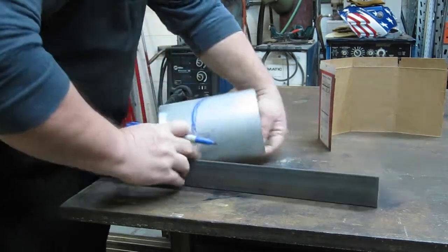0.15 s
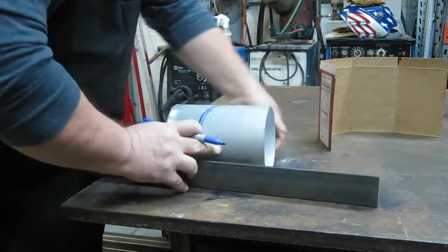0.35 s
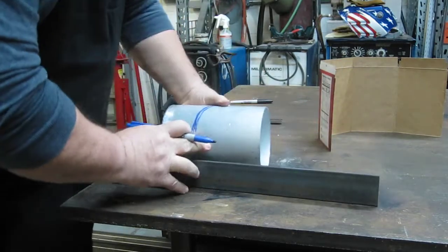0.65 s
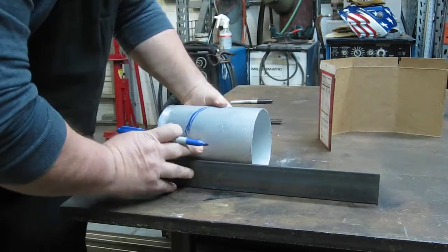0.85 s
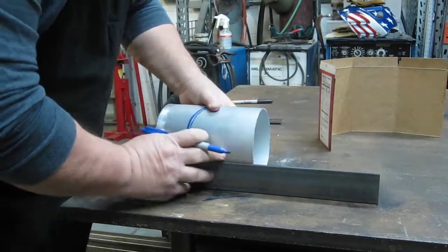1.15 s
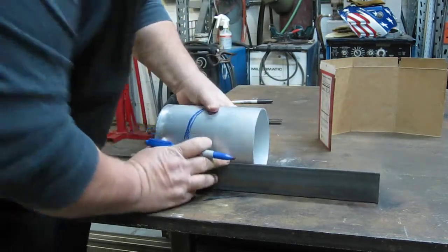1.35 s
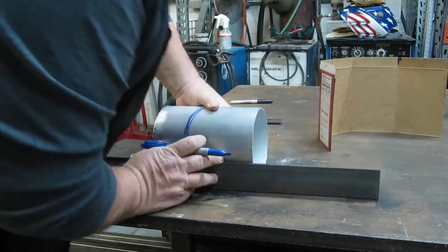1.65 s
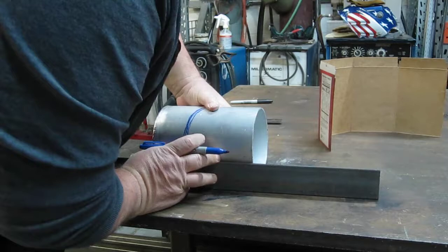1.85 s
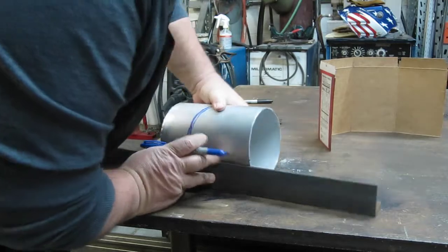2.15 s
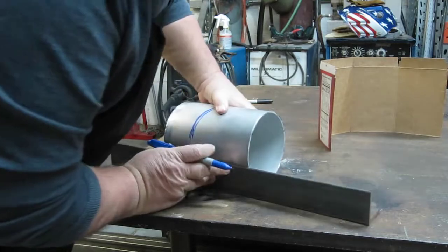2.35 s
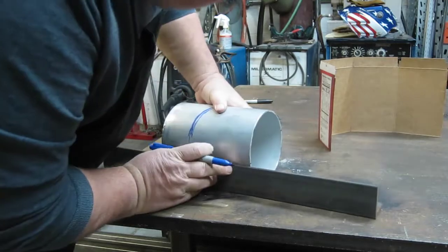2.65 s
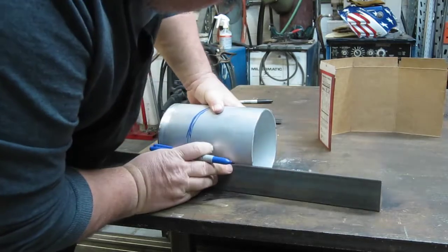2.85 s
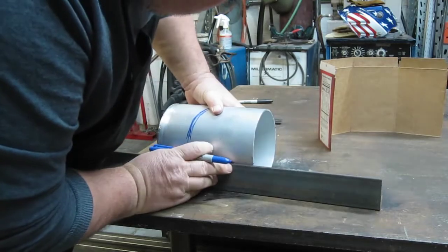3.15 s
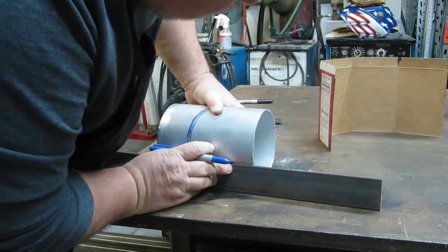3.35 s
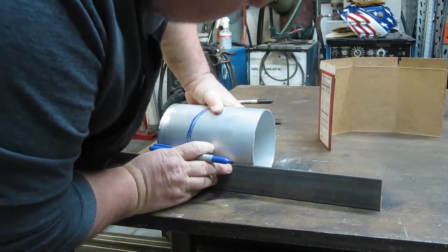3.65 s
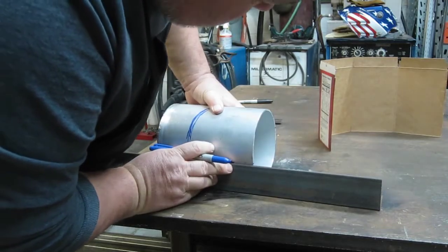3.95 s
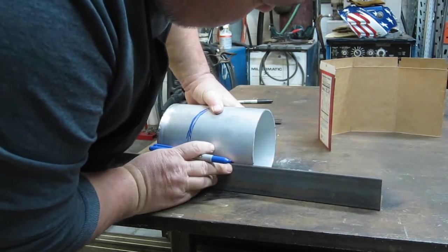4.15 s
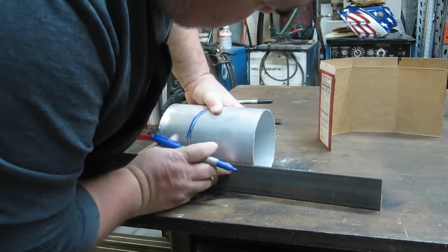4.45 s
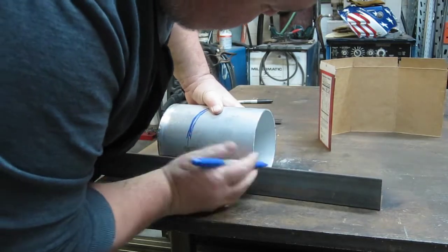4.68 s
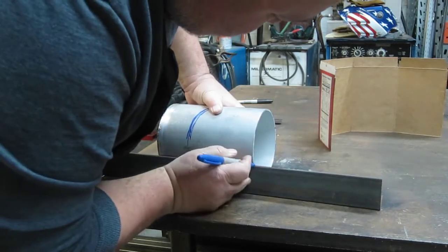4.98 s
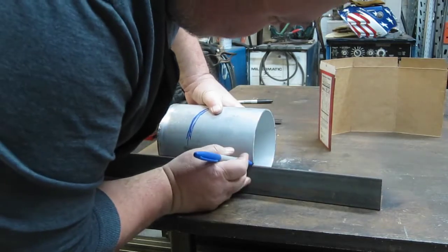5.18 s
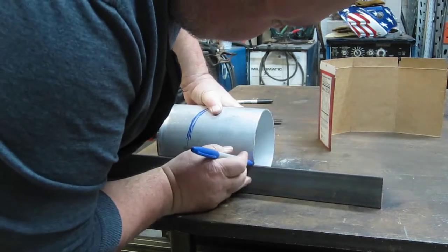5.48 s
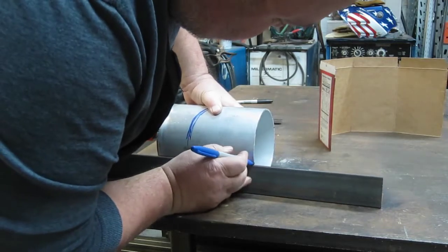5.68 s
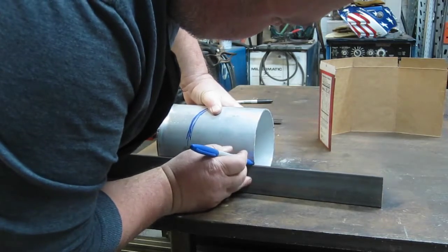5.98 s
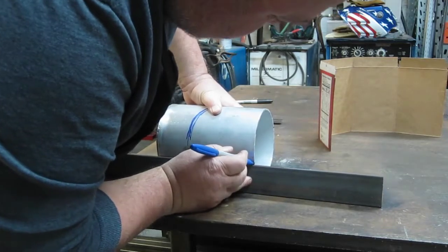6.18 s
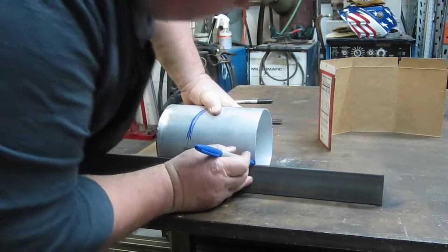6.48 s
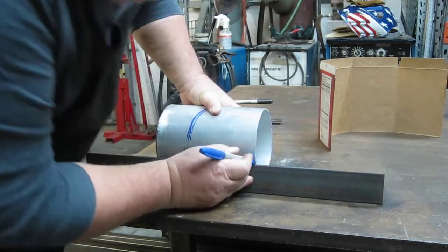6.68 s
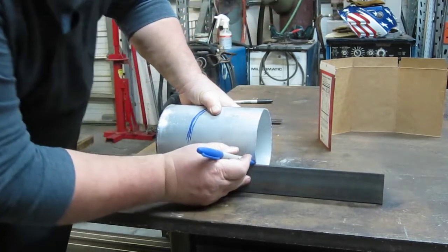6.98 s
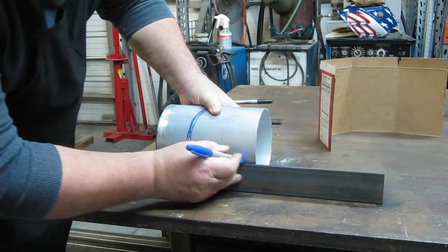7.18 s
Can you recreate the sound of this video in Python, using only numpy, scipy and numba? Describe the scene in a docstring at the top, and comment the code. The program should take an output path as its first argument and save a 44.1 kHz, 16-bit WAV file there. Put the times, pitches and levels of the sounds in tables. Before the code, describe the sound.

A thin aluminium tube squeals, clangs and bounces against a steel bar on a steel table, settles with knocks, then a felt marker hisses along it.

```python
"""Metal scrapes, squeals, knocks and bounces mingle as a thin aluminium tube rolls against a steel angle bar
on a steel table. Palms slide over the tube now and then; near the end a felt marker starts a line along it.
Decaying modes make the knocks, random grains the rattle and friction, uneven overtones the squeal.
Noise, faint tones and decaying noise tails make the echoing workshop; one microphone hears it all
behind a gain control that lets the loudest blows clip before they pull the level down."""
import sys
import numpy as np
from scipy import signal
from scipy.fft import rfft, irfft, next_fast_len
from scipy.io import wavfile
from scipy.ndimage import map_coordinates
from numba import njit

SR = 44100
rng = np.random.default_rng(int(sys.argv[2]) if len(sys.argv) > 2 else 0)


def log_audio(samples):
    """Write samples as a 16-bit WAV file to the path given in sys.argv[1]."""
    # one column per channel
    frames = np.atleast_2d(samples).T
    # limit to full scale, then quantise
    limited = np.clip(frames, -1, 1)
    pcm = np.round(limited * 32767).astype(np.int16)
    wavfile.write(sys.argv[1], SR, pcm)


N = 322812

# Levels are mix levels ahead of the echoes and the gain control; mode widths are those before any damping.
# workshop and microphone noise, spectrum points: pitch_hz, density_db [relative, per Hz]
AIR = [(12, -41), (20, -7), (65, -5), (187, -5), (268, -5), (365, -5), (797, -7), (1180, -2.5), (1390, -11),
       (1840, -6), (2000, -12.5), (2180, -7), (3130, -12.5), (11300, -21.5), (15800, -26.5)]
# faint tones, before they waver: pitch_hz, level_db [rms]
HUM = [(59.2, -67.5), (958.2, -68.5), (1319, -71.5), (1863, -67.5), (1895, -68.5), (2180, -67), (2724, -74)]
# decay of the workshop's echoes: pitch_hz, t60_s
SHOP = [(150, 0.73), (1000, 0.64), (4000, 0.57), (12000, 0.32)]
# a low rumble that comes and goes: peak_s, rise_s, fall_s, deep_db [near 55 Hz], low_db [near 120 Hz]
RUMBLE = [(2.1, .12, 0.21, -68, -45), (2.378, 0.12, 0.15, -60, -52), (6.55, .5, 1.3, -62.5, -73),
          (7.32, 0.25, .1, -59, -57)]
# squeals: peak_s, rise_s, fall_s, level_db
SQUEAL = [(0.0, .02, 0.16, -35.5), (1.95, .04, .1, -54), (2.06, 0.044, 0.031, -49),
          (2.15, 0.13, 0.16, -47.5), (4.385, .02, 0.1, -61)]
# overtones of the squeal, before they flutter: multiple [of the slip rate], level_db
OVERTONES = [(3, 11.5), (4, 4.5), (5, 10), (6, -2), (7, -20)]
# dry ticks of fingers and marker barrel: start_s, level_db, pitch_hz
TICKS = [(1.377, -27, 400), (1.626, -33, 8000), (3.19, -42, 10900), (4.386, -38, 4900), (5.369, -43, 2200),
         (5.47, -49, 6400), (5.554, -52, 5430), (5.751, -54, 8700), (6.316, -42.5, 2480),
         (6.336, -46, 6000), (6.471, -39, 9000), (6.636, -30, 4520), (6.639, -31, 11700),
         (6.889, -44, 12000), (6.905, -48, 6000)]
# the marker tip sets down, then gathers speed: peak_s, rise_s, fall_s, hiss_db, steel_db
MARKER = [(7.06, .07, 0.61, -46, -47), (7.23, 0.21, 0.54, -34.5, -51.5)]
# the tip catches as it starts: start_s, level_db [peak, 4 ms after the start]
CATCHES = [(6.997, -41), (7.019, -33), (7.037, -57), (7.0508, -33), (7.0806, -31)]
# spectrum of the felt's hiss: pitch_hz, density_db [relative, per Hz]
FELT = [(1290, -24), (2200, -14.5), (2680, -19), (2860, -11.5), (3730, -15.5), (4330, -15.5), (6320, -5.5),
        (11100, -9), (13600, -15), (15800, -31)]
# what hums under the marker: pitch_hz, width_hz, level_db
DRAWN = [(1073, 33, 4.5), (1800, 67, -0.5), (3770, 160, -3.5)]
# palms sliding on the tube: peak_s, rise_s, fall_s, dull_db, bright_db
PALMS = [(0.2, 0.41, 0.1, -41.5, -34.5), (0.94, 0.0038, 0.037, -22, -36), (0.965, 0.035, .07, -23, -24.5),
         (1.18, 0.051, 0.026, -46, -30.5), (1.298, 0.01, 0.016, -27, -28), (1.73, 0.097, 0.17, -25, -29.5),
         (4.546, .09, 0.013, -52.5, -40.5), (4.7, 0.085, 0.039, -57, -40.5), (4.882, .07, 0.029, -65, -51),
         (6.42, 0.21, 0.32, -52, -51.5), (6.47, 0.043, 0.046, -42, -61), (6.7, .1, 0.23, -69, -66),
         (6.904, .09, 0.055, -50, -51)]
# metal dragged on metal: peak_s, rise_s, fall_s, tube_db [rattle], bar_db [grind], table_db [grind]
DRAG = [(0.0, .05, 0.11, -31.5, -23, -25.5), (0.449, 0.16, 0.046, -12.5, -15.5, -43),
        (0.659, 0.2, 0.046, -24.5, -25, -35), (0.88, 0.19, 0.33, -31, -31, -35.5),
        (1.2, 0.071, 0.12, -47, -53, -51), (1.37, 0.12, 0.13, -49, -64, -43),
        (1.504, 0.082, 0.2, -35.5, -28, -40), (2.12, 0.16, 0.27, -44.5, -39.5, -39),
        (2.3, 0.064, 0.08, -32, -25, -28), (2.625, 0.017, 0.0083, -30, -33, -61),
        (2.953, 0.0084, 0.011, -27, -34, -60)]
# shell modes of the tube: pitch_hz, width_hz, level_db
TUBE = np.transpose([ [565, 1545, 2852, 2930, 3565, 3672, 4703, 4918, 5175, 5385, 5655, 6110, 6400, 6783, 6880, 7251, 7700, 8586, 9367, 9878, 10120, 10690, 11050, 12420, 13520],
        [6, 3, 8, 6, 8, 12, 6, 12, 11, 12, 10, 14, 14, 10, 12, 8, 14, 10, 10, 22, 10, 14, 20, 24, 30],
        [-16.5, -3, 0.83, 4.0, 1.9, 3.3, 0.98, -4.5, 2.8, -7, 0.5, -38.0, -10.5, -39, -5.5, -5, -7, -7.5, -26, -10.5, -32, -14, -14.5, -12, -38]])
# modes of the steel angle: pitch_hz, width_hz, level_db
BAR = np.transpose([ [950, 1048, 1160, 1237, 1330, 1710, 1765, 1865, 2030, 3030, 3360, 3812, 4060, 6010],
       [30, 18, 30, 30, 25, 22, 25, 20, 40, 30, 35, 35, 16, 25],
       [-0.5, 1.0, -2, -16.5, -17.5, 0.5, -49.0, -9, -4.0, -2.5, -4.5, -1.5, -4, -8.0]])
# modes of the steel table top: pitch_hz, width_hz, level_db
TABLE = np.transpose([ [200, 320, 385, 455, 517, 650, 750, 838], [60, 40, 16, 25, 16, 40, 30, 12],
         [-8.5, -3, 1.0, -8, -9.5, -9, -3.5, -4.0]])
# knocks, and at 1.448 s the first touch of a scrape: start_s, level_db, tube_db, bar_db, table_db, grip_db
# [above 1 Hz of width added to the tube; the bar gets 1.46 times as much], hardness_db [per octave],
# favoured_hz [mode the contact point favours and the grip spares], favoured_db
BLOWS = [(0.0, -28, 3.5, -10, -37, 2, 5, 4918, 15), (0.087, 3.5, -28, -33, -20.5, 28, -16.5, 1003, 0),
         (0.279, 16.5, -11.5, -13.5, -26.5, 10, 3.5, 1545, 14),
         (0.612, -19, 0, -18, -26, 10, -10.5, 2852, 9),
         (0.817, -3.5, 2, 6.5, -37.5, 37.5, -5.5, 2852, -4.5),
         (0.962, -12.5, -14, -12, -13.5, 18, -9, 3000, 11),
         (1.065, -3.5, -30, -5, -43, 37.5, -9.5, 1684, 20), (1.448, -19.5, -5, -7.5, -9, -6, 3, 3670, 3),
         (1.47, 5, -19.5, -13, -30.5, 17, -1.5, 3670, 0), (1.786, -13, -32.5, 2.5, -17, 36, 2, 377, 23),
         (2.235, -24, 4, 18.5, -31, 28, -6, 1728, 11), (2.288, -8.5, 3.5, 6, -21, 46, 0.5, 1048, 1.5),
         (2.397, -20.5, -12.5, 18, -14, 47.5, -4, 3670, -5),
         (2.63, 11.5, -5.5, 5.5, -27.5, 45, -2.5, 1188, 2), (2.957, 4.5, -8, 1, -22, 35.5, -5, 2852, -6),
         (4.97, -23, -2, 8, -14, 32, 0.5, 385, 13)]
# the tube bounces after it lands: start_s, level_db, favoured_hz
BOUNCES = [(0.365, 3, 2852), (0.413, 3, 3565), (0.448, -5.5, 3672), (0.469, -6, 2852), (0.487, -3, 5655)]
# touch shared by the bounces: tube_db, bar_db, table_db, grip_db [as for the knocks],
# hardness_db [per octave], favoured_db
BOUNCE_TOUCH = (5, -1, -41, 35.5, -1, 0.5)

SLIP_HZ = 2170  # centre of the squeal's uneven slip rate
TICK_T60_S, TICK_Q = 0.039, 2.5
BRIGHT_LAG = 0.22  # the bright part of a slide peaks this share of the fall later
ROUND = 1.29  # shape of a swell: 1 pointed, 2 round
TOP_HZ = 15900  # nothing passes at or above this pitch


def amp(db):
    """Gain of a level in dB."""
    return 10 ** (np.asarray(db) / 20)


def unit(x):
    """x at rms 1."""
    return x / np.sqrt(np.mean(x ** 2) + 1e-20)


def along(points, hz):
    """Reads a curve of (pitch_hz, value) points on a log pitch axis."""
    f, v = np.transpose(points)
    return np.interp(np.log(hz + 1), np.log(f + 1), v)


def wobble(rate):
    """A smooth random curve, rate knots a second."""
    knots = rng.standard_normal(int(N * rate / SR) + 4)
    return map_coordinates(knots, [np.arange(N) * rate / SR])


def filtered(x, response):
    """x times a complex response of frequency."""
    m = next_fast_len(N + SR // 2)
    return irfft(rfft(x, m) * response(np.fft.rfftfreq(m, 1 / SR)), m)[:N]


def body(modes, widen):
    """Causal response of a set of resonances with alternating signs, their widths scaled by widen."""
    def response(f):
        total = 0
        for k, (hz, width, db) in enumerate(modes):
            damping = 1j * f * width * widen
            total = total + (-1) ** k * amp(db) * damping / (hz * hz - f * f + damping)
        return total
    return response


def hump(hz, q):
    """Response of one broad resonance passed twice."""
    def response(f):
        damping = 1j * f * hz / q
        return (damping / (hz * hz - f * f + damping)) ** 2
    return response


def grit(rate, spread_db):
    """Tiny impacts at random moments and strengths, rate a second on average."""
    return (rng.random(N) < rate / SR) * amp(spread_db * rng.standard_normal(N)) * rng.standard_normal(N)


def swells(rows, lag=0):
    """One gain curve per level column: each row rises to its peak and falls, 20 dB in its rise and fall time."""
    s, rise, fall, *levels_db = np.transpose(rows)[:, :, None]
    grid = np.arange(0, N + 32, 32)  # coarse time steps, joined by straight lines
    t = grid / SR - s - lag * fall
    shape = amp(-20 * np.where(t < 0, -t / rise, t / fall) ** ROUND)
    return [np.interp(np.arange(N), grid, np.sum(amp(db) * shape, axis=0)) for db in levels_db]


def radiated(f, low_hz=260, high_hz=12200):
    """Thin metal sends out little bass, and the topmost treble fades on the way."""
    bass_cut = 1j * f / (low_hz + 1j * f)
    return (bass_cut / (1 - (f / high_hz) ** 2 + 1.2j * f / high_hz)) ** 2


def workshop():
    """Steady background noise with a few faint, wavering tones."""
    air = unit(filtered(rng.standard_normal(N), lambda f: amp(along(AIR, f))))
    t = np.arange(N) / SR
    hum = 0
    for hz, db in HUM:
        gain = amp(db + 3.2 * wobble(12)) * np.sqrt(2)  # sqrt(2) turns rms into peak
        hum = hum + gain * np.sin(2 * np.pi * hz * t + 0.39 * wobble(13.0))
    return amp(-51.5 + 0.29 * wobble(3.036)) * air + hum


def rumble():
    """Noise swells in two broad bands below most of the table's ring."""
    def band(hz):
        resonance = body([(hz, 1.1 * hz, 0)], widen=1)
        return unit(filtered(rng.standard_normal(N), lambda f: resonance(f) ** 2))
    deep, low = swells(RUMBLE)
    return deep * band(hz=55) + low * band(hz=126)


def echoes(x, size=16384):
    """The hall answers each stretch of sound with a new noise tail; every frequency dies at its own speed."""
    out, x = np.zeros(N + 2 * SR + size), np.pad(x, size)
    window = np.sqrt(np.hanning(size))
    for start in range(0, N + size, size // 2):
        hz, t, z = signal.stft(rng.standard_normal(SR * 2 // 3), SR, nperseg=256)
        decay = amp(-60 * t / along(SHOP, hz)[:, None])
        tail = signal.istft(z * decay, SR, nperseg=256)[1]
        wet = signal.fftconvolve(x[start:start + size] * window, tail / np.linalg.norm(tail))
        out[start + 300:][:len(wet)] += wet  # 300 samples of pre-delay
    return out[size:size + N]


def squeal():
    """Fast stick and slip: broken, fluttering overtones of one uneven slip rate."""
    slip_hz = SLIP_HZ * (1 + .007 * wobble(300) + .006 * wobble(25))
    phase = 2 * np.pi * np.cumsum(slip_hz) / SR
    voice = 0
    for multiple, db in np.array(OVERTONES):
        flutter_db = -13 * abs(wobble(30)) + 2.5 * wobble(120)
        voice = voice + amp(db + flutter_db) * np.sin(multiple * phase)
    return swells(SQUEAL)[0] * voice


def ticks():
    """Each tick is a short puff of noise in one broad resonance."""
    out, t, f = np.zeros(N + SR), np.arange(4096) / SR, np.fft.rfftfreq(4096, 1 / SR)
    envelope = amp(-60 * t / TICK_T60_S) * (1 - np.exp(-t / 0.00066))
    for s, db, hz in TICKS:
        noise = rng.standard_normal(len(t))
        puff = unit(irfft(rfft(noise) * hump(hz, TICK_Q)(f))) * envelope
        out[round(s * SR):][:len(t)] += amp(db) * puff
    return out[:N]


def marker():
    """The felt tip hisses, a little through the tube's modes, and its drag hums in the bar."""
    hiss_gain, steel_gain = swells(MARKER)
    t = np.arange(N) / SR
    catches = sum(amp(db - 60 * abs(t - s - .004) / 0.014) for s, db in CATCHES)
    tip = grit(12000, spread_db=2.5)
    tube = body(TUBE, widen=9)
    hiss = unit(filtered(tip, lambda f: amp(along(FELT, f)) * (1 + 0.45 * tube(f))))
    bar = unit(filtered(grit(5200, spread_db=4.5), body(DRAWN, widen=0.9)))
    return amp(0.52 * wobble(40)) * ((hiss_gain + catches) * hiss + steel_gain * bar)


def palms():
    """Skin friction: dense grains in a low and a high hump; the high one peaks later."""
    dull, bright = swells(PALMS)[0], swells(PALMS, lag=BRIGHT_LAG)[1]
    low = unit(filtered(grit(9000, spread_db=2.5), hump(hz=3100, q=0.7)))
    high = unit(filtered(grit(9000, spread_db=2.5), hump(hz=8700, q=0.51)))
    return amp(1.9 * wobble(60)) * (dull * low + bright * high)


def drag():
    """Grit between the surfaces feeds the hand-damped tube, the bar and the table."""
    tube_modes = body(TUBE, widen=7)

    def tube(f):
        return tube_modes(f) + amp(-25.5) * 1j * f / 5000  # a bright edge over the modes

    out = 0
    for gain, response in zip(swells(DRAG), (tube, body(BAR, widen=12.3), body(TABLE, widen=3.0))):
        grains = grit(2500, spread_db=3)
        uneven = gain * amp(1.5 * wobble(45.7)) * grains
        out = out + filtered(uneven, response) / np.std(filtered(grains, response))
    return out


def ring(modes, t, added_hz, tilt_db, free_hz, free_db):
    """Free decay of the modes; a hard contact favours the high ones, a grip shortens all but the spared one."""
    hz, width, db = np.transpose(modes)[:, :, None]
    spared = np.exp(-(np.log(hz / free_hz) / .018) ** 2)  # 1 at the favoured mode, near 0 away from it
    chance_db, phase = rng.normal(0, 2, size=hz.shape), rng.uniform(0, 2 * np.pi, size=hz.shape)
    level = amp(db + tilt_db * np.log2(hz / 2000) + chance_db)
    damped_width = width + added_hz * (1 - .93 * spared)
    fade = np.exp(-np.pi * damped_width * t) * (1 - np.exp(-t / .0004))
    swing = np.sin(2 * np.pi * hz * t + phase)
    return np.sum(level * amp(free_db * spared) * fade * swing, axis=0) / np.linalg.norm(level)


def contacts():
    """Blows and bounces as rows of one form, in time order."""
    *touch, favoured_db = BOUNCE_TOUCH
    bounces = [(s, db, *touch, hz, favoured_db) for s, db, hz in BOUNCES]
    return sorted([tuple(row) for row in BLOWS] + bounces)


def blows():
    """Each contact is a short noise crack; tube, bar and table ring on at new strengths."""
    out, t = np.zeros(N + SR), np.arange(SR // 2) / SR
    hz = np.fft.rfftfreq(2048, 1 / SR)
    rows = contacts()
    ends = [row[0] for row in rows[1:]] + [N / SR]
    for (s, db, tube_db, bar_db, table_db, grip_db, *touch), until in zip(rows, ends):
        # touch holds hardness_db, favoured_hz, favoured_db
        slope = amp(touch[0] * np.log2(hz / 2000 + .5)) * hz ** 2 / (hz ** 2 + 600 ** 2)
        noise = np.resize(unit(irfft(rfft(rng.standard_normal(2048)) * slope)), len(t))
        crack = noise * amp(-60 * t / 0.054) * (1 - np.exp(-t / 0.0006))
        stilled = amp(-60 * np.clip(t - (until - s), 0, None) / 0.025)  # the next contact stops the tube
        tube = amp(tube_db) * ring(TUBE, t, amp(grip_db), *touch) * stilled
        bar = amp(bar_db) * ring(BAR, t, 1.46 * amp(grip_db), *touch)
        table = amp(table_db) * ring(TABLE, t, 0.62, 0, *touch[1:])
        out[round(s * SR):][:len(t)] += amp(db) * (0.14 * crack + tube + bar + table)
    return out[:N]


def scene():
    """Everything reaches the one microphone; both channels carry it. The ticks feed the hall less."""
    near = filtered(blows() + drag() + palms(), radiated) + marker() + squeal()
    taps = filtered(ticks(), radiated)
    hall = amp(-5.5) * echoes(near + amp(-4.5) * taps)
    return np.tile(near + taps + hall + workshop() + rumble(), (2, 1))


@njit
def follow(size, rise, fall):
    """A level detector that charges fast and drains slowly."""
    out, level = np.empty(len(size)), 0.
    for i in range(len(size)):
        level += (size[i] - level) * (rise if size[i] > level else fall)
        out[i] = level
    return out


def record(dry):
    """Gain control a few ms late, so that the loudest blows clip; then a treble roll-off and the band limit."""
    late = round(.0045 * SR)
    detected = follow(np.abs(dry[0]), 1 / (0.0023 * SR), 1 / (.06 * SR))
    level = np.pad(detected, (late, 0))[:N]
    controlled = dry[0] / (1 + (level / amp(-11)) ** 3) ** 0.4
    clipped = controlled / (1 + np.abs(controlled / .64) ** 8) ** (1 / 8)  # rounded ceiling at 0.64

    def treble(hz):
        return (hz < TOP_HZ) / np.sqrt(1 + (hz / 13500) ** 8)

    return np.tile(filtered(clipped, treble), (2, 1))


dry = scene()
out = record(dry)
log_audio(out)
```